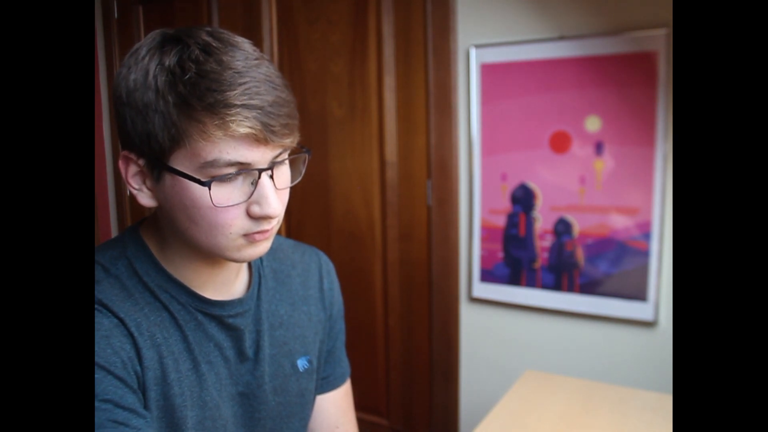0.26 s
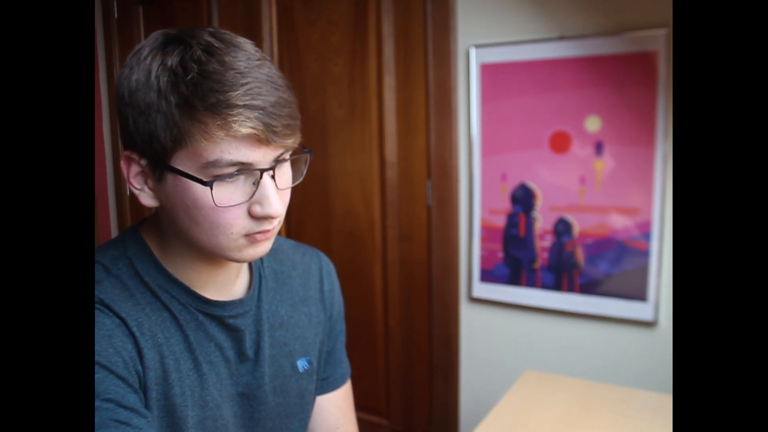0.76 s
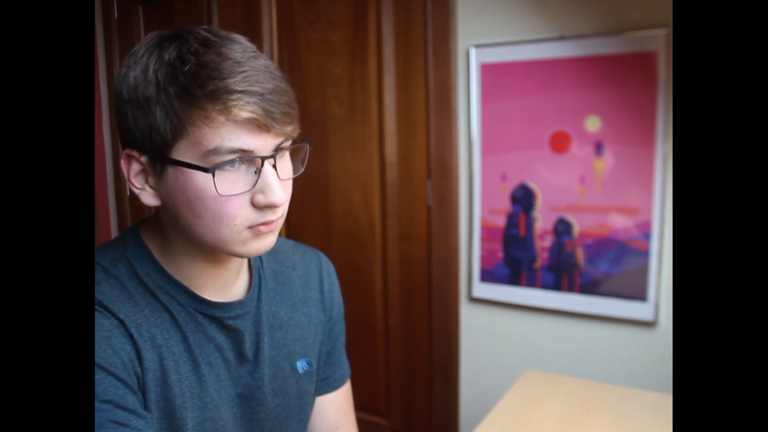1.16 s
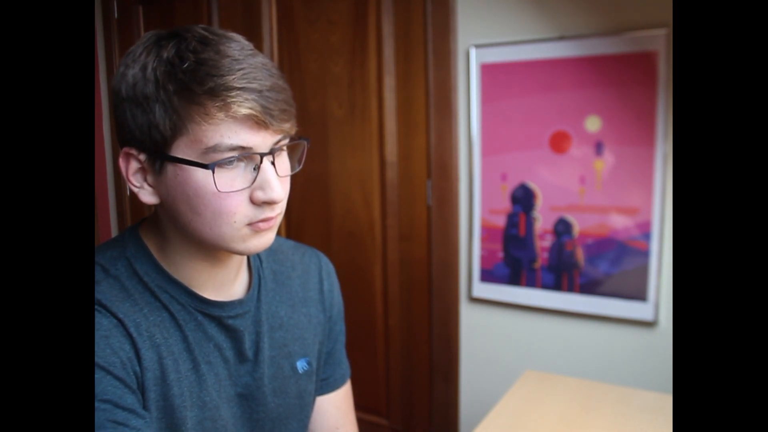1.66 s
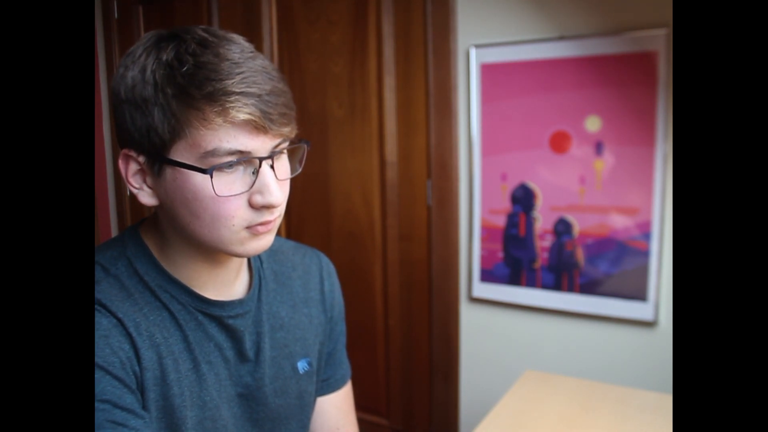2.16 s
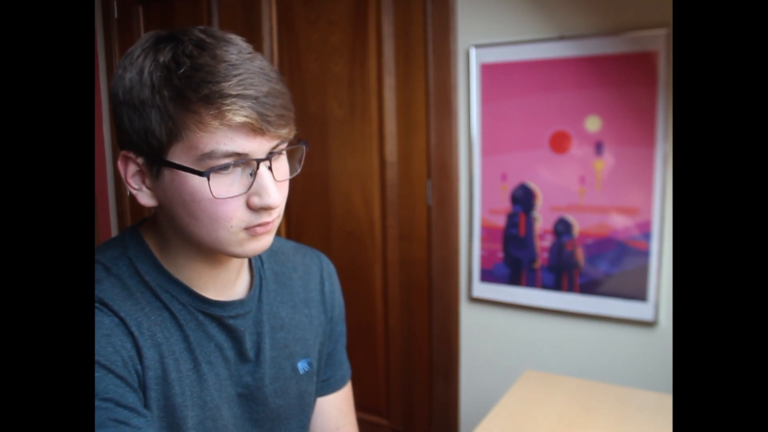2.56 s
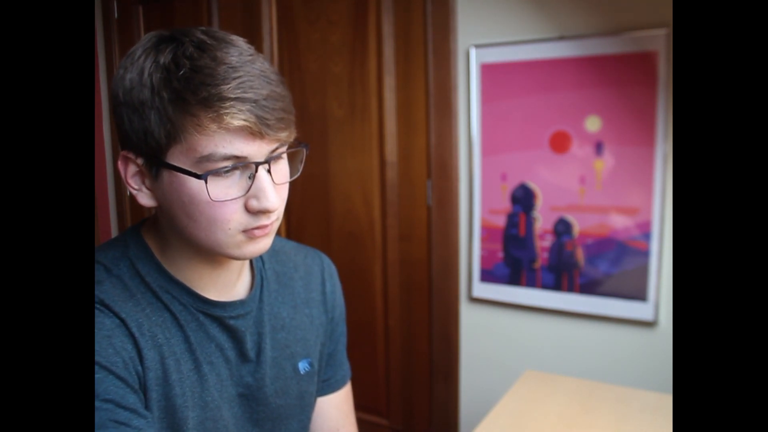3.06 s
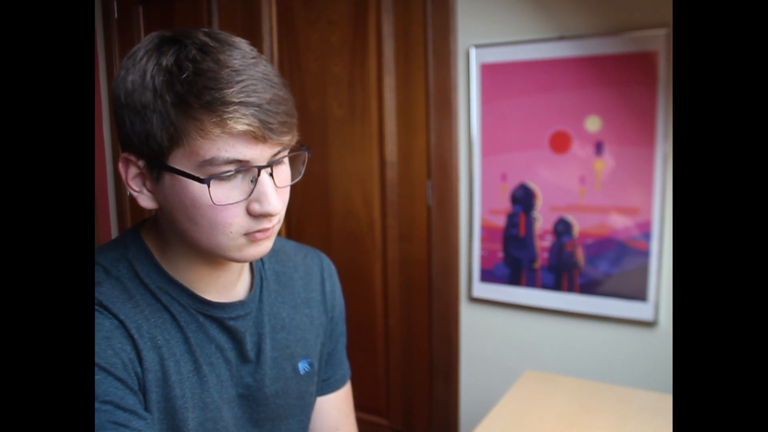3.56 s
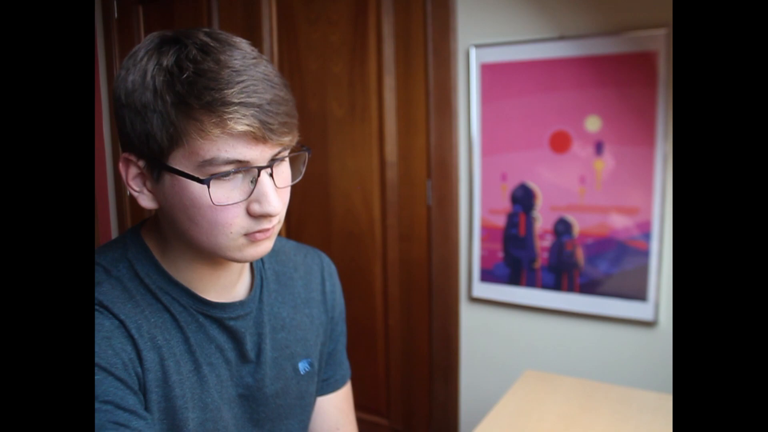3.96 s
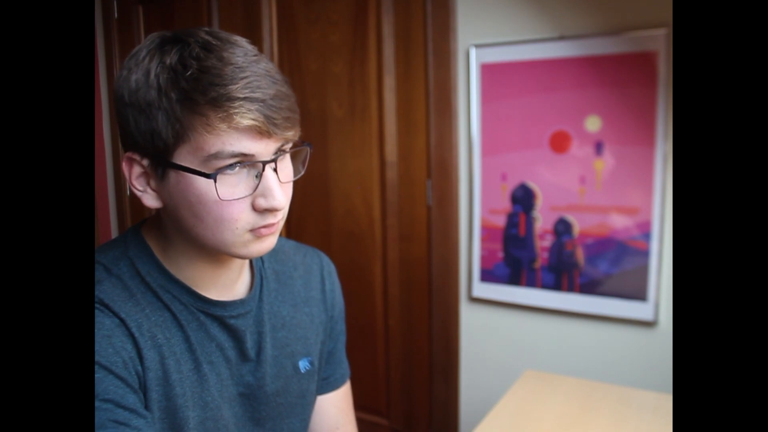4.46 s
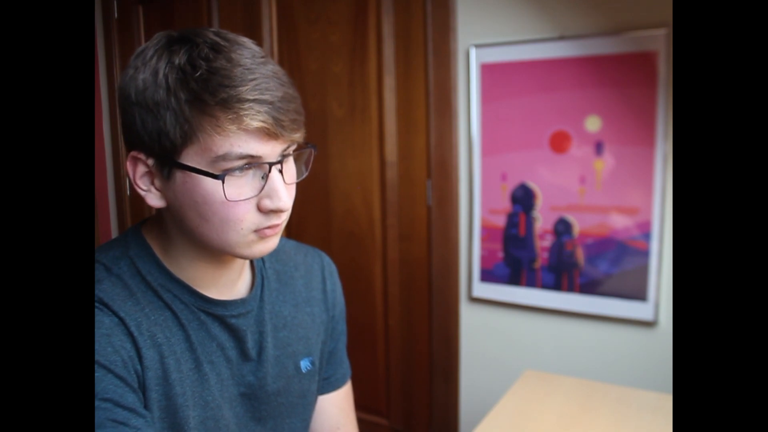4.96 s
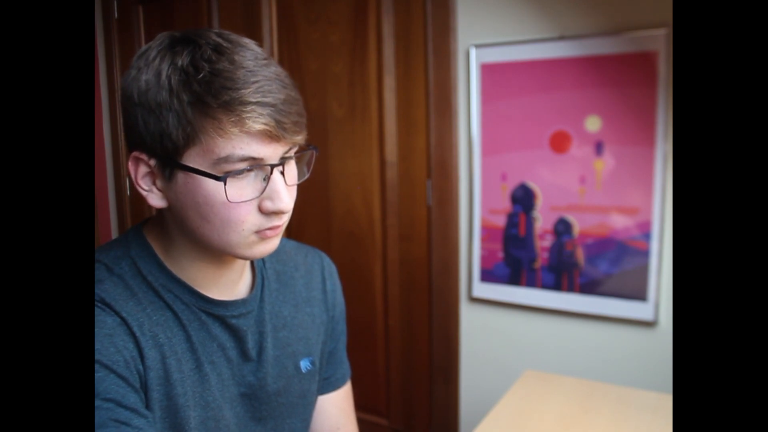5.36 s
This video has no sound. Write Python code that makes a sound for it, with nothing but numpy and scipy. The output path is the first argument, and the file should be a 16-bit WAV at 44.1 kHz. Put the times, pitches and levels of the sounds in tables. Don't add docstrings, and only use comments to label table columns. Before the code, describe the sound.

Six crisp computer mouse clicks, unevenly spaced, with soft low desk thuds over faint hiss and rumble in a small quiet room.

```python
import sys
import numpy as np
from scipy import signal
from scipy.fft import rfft, irfft
from scipy.io import wavfile
from scipy.ndimage import uniform_filter1d

SR = 44100
rng = np.random.default_rng(int(sys.argv[2]) if len(sys.argv) > 2 else 0)


def natural_amplitude(level_db):
    exponent = np.asarray(level_db, float) / 20
    return 10 ** exponent


def store_wav(level_fs):
    pcm = np.round(np.clip(np.atleast_2d(level_fs), -1, 1) * 32767)
    wavfile.write(sys.argv[1], SR, pcm.T.astype(np.int16))


N = 247489

# [f/Hz, level/dB per Hz]
HISS_COLOUR = [(8.8, -23.5), (17, 0), (30, -3.5), (49, -11.5), (150, -15), (1020, -33), (3500, -35),
               (15600, -40.5)]
# [f/Hz, level/dB]
WHINE_TONES = [(1000, -79.5), (2000, -81), (3000, -82), (3666, -85.5), (4000, -82.5), (5000, -84),
               (6000, -86.5), (9000, -87.5), (10000, -88.5), (11000, -85.5), (12000, -88.5), (13000, -85.5),
               (14000, -88.5), (15000, -84.5)]
# [t/s, level/dB]
PALM_RUB = [(0.0, -64), (0.1, -73), (0.25, -67), (0.41, -59.5), (0.6, -70), (0.72, -62.5), (1.3, -69),
            (1.47, -59), (1.6, -67.5), (2.2, -72), (2.38, -58.5), (2.6, -65.5), (3.4, -71.5), (3.64, -65.5),
            (4.1, -71), (4.4, -59.5), (4.6, -67.5), (5.2, -64)]
# [f/Hz, width/Hz, level/dB]
RUB_RINGS = [(260, 110, 4.5), (449, 170, 9), (666, 280, -5.5), (876, 470, -6)]
# [t/s, board level/dB, second mode/dB, third mode/dB, stand sway/dB]
DOWN_BUMPS = [(0.811, -34, -40.5, -51.5, -35.5), (1.319, -33, -35.5, -45.5, -35),
              (1.98, -67, -44.5, -51.5, -60), (2.38, -30, -32.5, -48, -41),
              (2.908, -32.5, -38.5, -44.5, -31), (3.635, -35.5, -67, -55, -62),
              (4.267, -39, -52, -47, -57.5), (4.33, -38.5, -23.5, -22, -37.5),
              (4.833, -59, -40, -42.5, -43), (4.929, -46, -47, -46.5, -60), (5.013, -32, -37, -50, -40)]
# [t/s, board/dB, second/dB, third/dB, sway/dB]
UP_BUMPS = [(0.007, -45, -54, -64, -65), (0.196, -41, -46, -64, -44), (0.384, -61, -51.5, -51, -53),
            (0.414, -52, -64, -52, -60), (0.844, -65, -46.5, -72, -42), (0.856, -48, -65, -73, -46),
            (1.435, -33, -44, -57, -67), (1.538, -55, -45.5, -58, -59), (2.309, -44, -54, -53, -52),
            (2.349, -43, -51, -62, -59), (2.99, -56.5, -56, -55, -52), (3.15, -37, -39.5, -54, -40),
            (3.654, -37, -54.5, -52.5, -57), (3.709, -50, -53, -66, -47), (4.279, -48.5, -45.5, -46, -56.5),
            (4.871, -51, -48, -49.5, -55), (4.901, -57, -49, -55, -58), (5.064, -42, -42.5, -50, -56),
            (5.139, -51.5, -48, -52, -63)]
# [f/Hz, time to fall 60 dB/s, rise/s]
DESK_MODES = [(66.3, 0.33, .002), (128.7, 0.17, 0.0048), (183.4, 0.14, 0.01), (305, 0.072, 0.0052),
              (31.4, 0.067, .004)]
# [delay/s, polarity]
DESK_TRAVEL = [(0, 1), (.003, 1), (.006, 1), (.004, 1), (.005, -1)]
# [t/s, leaf rattle level/dB, shell level/dB]
FINGER_TOUCHES = [
    (0.309, -66, -54),
    (1.426, -58, -49.5),
    (1.467, -61, -58),
    (2.2943, -59, -50.5),
    (3.632, -58, -48),
    (4.2581, -58, -54.5),
    (4.334, -61.5, -56.5),
    (5.0592, -57, -47),
]
# [t/s, switch ring/dB, upper ring/dB, top fizz/dB, shell/dB]
SWITCH_SNAPS = [(0.3485, -45.5, -49, -45, -60), (0.374, -41.5, -42, -36.5, -57),
                (1.4287, -43.5, -39.5, -41.5, -50.5), (1.508, -44, -42, -41, -47.5),
                (2.3124, -48, -48, -42, -61), (2.3464, -44, -40.5, -45, -48.5),
                (3.6357, -37.5, -41, -34, -38.5), (3.699, -46.5, -44.5, -40, -51),
                (4.2651, -42.5, -43, -42.5, -49), (4.3114, -50.5, -39, -44.5, -49.5),
                (5.063, -49, -40, -50, -45.5), (5.1403, -47, -42, -41.5, -50)]
# [f/Hz, width/Hz, level/dB]
RING_GROUPS = [
    [(7200, 920, 3.5), (6740, 920, -10), (7870, 1400, -6)],
    [(11230, 1100, 2.5), (10200, 3800, -6)],
    [(13150, 3000, 2.5), (15700, 3100, -0.5)],
    [(5750, 1800, 6), (4210, 1500, -0.5)],
    [(2946, 1240, -3), (1914, 1300, -5), (1130, 830, -8)],
]
DRIVE_TIMES = [.0014, 0.0012, 0.0014, 0.002, 0.002]
RISE_TIMES = [0.0007, .0002, 0.00016, 0.001, 0.0016]
# [delay/s, level/dB]
REFLECTIONS = [(.0025, -3), (.0066, -2.5), (.0095, -11), (0.023, -7.5)]
# [f/Hz, time to fall 60 dB/s]
ROOM_DECAY = [(700, 0.23), (2600, 0.3), (7000, 0.22), (11000, 0.23), (15000, .15)]
# [f/Hz, level/dB]
ROOM_COLOUR = [(700, -1.5), (6300, 0), (7200, 3), (8200, -0.5), (9500, 0.5), (11300, -8), (13000, -7),
               (16000, -9)]
# [t/s, f/Hz, time to fall 60 dB/s, level/dB]
FOOT_TICK = (1.463, 880, 0.1, -49)
# [t/s, f/Hz, level/dB]
FINGER_SQUEAK = [
    (4.2, 5960, -95.5),
    (4.215, 6050, -70),
    (4.236, 5970, -73),
    (4.25, 6080, -77.5),
    (4.265, 6100, -82.5),
]


def evened(x):
    return x / np.sqrt(np.mean(x ** 2) + 1e-20)


def read(points, hz):
    f, value = np.transpose(points)
    return np.interp(np.log(hz + 1), np.log(f + 1), value)


def add(mix, s, sound):
    part = mix[round(s * SR):][:len(sound)]
    part += sound[:len(part)]


def resonate(x, hz, width):
    pole = np.exp((2j * np.pi * hz - np.pi * width) / SR)
    return 2 * signal.lfilter([1 - abs(pole)], [1, -pole], x).real


def ring_parts(drive, parts, pitch=1):
    total = 0
    for hz, width, db in parts:
        once = resonate(drive, hz * pitch, width)
        total = total + natural_amplitude(db) * resonate(once, hz * pitch, 2 * width)
    return total


def even_colour(x):
    z = rfft(x)
    return irfft(z / np.sqrt(uniform_filter1d(abs(z) ** 2, size=5) + 1e-12), len(x))


def hiss(level_db=-51.5, patchy_db=1.3, rumble_db=-1.0, rumble_hz=150):
    frames, hz = N // 512 + 5, np.fft.rfftfreq(2048, 1 / SR)
    real, imaginary, patches = rng.standard_normal((frames, 1025, 3)).T
    patches = evened(uniform_filter1d(uniform_filter1d(patches, 20, 0), 6, 1))
    lumps = evened(uniform_filter1d(rng.standard_normal(frames), 8))
    low = 1 / (1 + (hz / rumble_hz) ** 2)
    colour_db = read(HISS_COLOUR, np.minimum(hz, 15000))[:, None]
    frame_db = colour_db + patchy_db * patches + rumble_db * low[:, None] * lumps
    z = (real + 1j * imaginary) * natural_amplitude(frame_db)
    noise = signal.istft(z, nperseg=2048, noverlap=1536)[1][:N]
    return natural_amplitude(level_db) * evened(noise)


def whine(waver=0.69, waver_hz=0.632):
    t, out = np.arange(N) / SR, np.zeros(N)
    phases = rng.uniform(0, 2 * np.pi, (len(WHINE_TONES), 2))
    for (hz, db), (tone_phase, waver_phase) in zip(WHINE_TONES, phases):
        swell = 1 + waver * np.sin(2 * np.pi * waver_hz * t + waver_phase)
        out += np.sqrt(2) * natural_amplitude(db) * np.sin(2 * np.pi * hz * t + tone_phase) * swell
    return out


def rub(slips_per_s=2500, spread_db=1.5):
    s, db = np.transpose(PALM_RUB)
    sizes = rng.standard_normal(N) * natural_amplitude(spread_db * rng.exponential(1, N))
    slips = sizes * (rng.random(N) < slips_per_s / SR)
    return natural_amplitude(np.interp(np.arange(N) / SR, s, db)) * evened(ring_parts(slips, RUB_RINGS))


def bumps(gain_db=3.0, fourth_db=-14.5):
    t, out, modes = np.arange(SR // 2) / SR, np.zeros(N), []
    for (hz, t60, rise), (lag, polarity) in zip(DESK_MODES, DESK_TRAVEL):
        u = np.maximum(t - lag, 0)
        swell = 1 - np.exp(-(u / rise) ** 2)
        mode = swell * natural_amplitude(-60 * u / t60) * np.sin(2 * np.pi * hz * u)
        modes.append(polarity * mode / abs(mode).max())
    for sign, rows in ((-0.65, DOWN_BUMPS), (0.82, UP_BUMPS)):
        for s, board_db, second_db, third_db, sway_db in rows:
            levels_db = (board_db, second_db, third_db, third_db + fourth_db, sway_db)
            bump = sum(natural_amplitude(db + gain_db) * mode for db, mode in zip(levels_db, modes))
            add(out, s, sign * bump)
    return out


def strikes(press_db=-3.5, release_db=-7.5, touch_db=-1.3, touch_switch_db=-1.5, touch_fizz_db=3.5):
    rows = []
    for k, snap in enumerate(SWITCH_SNAPS):
        body_db = release_db if k % 2 else press_db
        rows.append((*snap, snap[-1] + body_db))
    for s, leaf, shell in FINGER_TOUCHES:
        rows.append((s, leaf + touch_switch_db, leaf, leaf + touch_fizz_db, shell, shell + touch_db))
    return rows


def snaps(gain_db=5.0, press_pitch=1, release_pitch=1.052):
    t, out = np.arange(900) / SR, np.zeros(N)
    for k, (s, *levels_db) in enumerate(strikes()):
        chatter = rng.standard_normal(len(t))
        pitch = release_pitch if k % 2 else press_pitch
        for db, group, last, rise in zip(levels_db, RING_GROUPS, DRIVE_TIMES, RISE_TIMES):
            burst = chatter * (1 - np.exp(-t / rise)) * np.exp(-t / last)
            drive = even_colour(burst) * np.exp(-t / (3 * last))
            ring = ring_parts(drive, group, pitch)
            add(out, s, natural_amplitude(db + gain_db) * ring / abs(ring).max())
    return out


def room(x, tail_db=-1.5, start_s=0.012, scatter_s=0.0016, dull_hz=11000):
    out, t_all = x.copy(), np.arange(N) / SR
    scatter = rng.standard_normal((len(REFLECTIONS), 200)) * np.exp(-np.arange(200) / SR / scatter_s)
    scatter[:, 0] = 5
    dulled = signal.lfilter(*signal.butter(1, dull_hz, fs=SR), x)
    for (s, db), rough in zip(REFLECTIONS, scatter):
        add(out, s, natural_amplitude(db) * signal.oaconvolve(dulled, rough / np.linalg.norm(rough))[:N])
    taps = rng.choice([-1., 1.], (3, SR // 2)) * (rng.random((3, SR // 2)) < 1 / 8)
    taps[:, :round(start_s * SR)] = 0
    hz, t, z = signal.stft(taps, SR, nperseg=128)
    fade_db = read(ROOM_COLOUR, hz)[:, None] - 60 * t / read(ROOM_DECAY, hz)[:, None]
    tails = signal.istft(z * natural_amplitude(fade_db), SR, nperseg=128)[1]
    for k, tail in enumerate(tails):
        share = np.sqrt(2 / 3) * np.cos(2 * np.pi * (3 * t_all + k / 3))
        out += natural_amplitude(tail_db) * signal.fftconvolve(x * share, tail / np.linalg.norm(tail))[:N]
    return out


def knock(rise_s=0.00087):
    s, hz, t60, db = FOOT_TICK
    t, out = np.arange(6000) / SR, np.zeros(N)
    fade = natural_amplitude(db - 60 * t / t60) * (1 - np.exp(-t / rise_s))
    add(out, s, fade * np.sin(2 * np.pi * hz * t))
    return out


def squeak():
    s, hz, db = np.transpose(FINGER_SQUEAK)
    t = np.arange(N) / SR
    tone = np.sin(2 * np.pi * np.cumsum(np.interp(t, s, hz)) / SR)
    return natural_amplitude(np.interp(t, s, db, -200, -200)) * tone


def scene():
    electronics = hiss() + whine()
    desk = rub() + bumps() + knock()
    mouse = room(snaps() + squeak())
    return (electronics + desk + mouse)[None]


def band_limit(x):
    return signal.sosfilt(signal.butter(12, 16940, fs=SR, output="sos"), x)


def record(dry, edge_hz=15950, leak_db=-32.5, cut_s=5.4125, fade_s=0.0019):
    lowpass = signal.firwin(511, edge_hz, window=("kaiser", 5), fs=SR)
    limited = signal.oaconvolve(dry, lowpass[None], "same")
    limited += natural_amplitude(leak_db) * dry
    gate = np.clip((cut_s - np.arange(N) / SR) / fade_s, 0, 1)
    return band_limit(limited * gate)


dry = scene()
out = record(dry)
store_wav(out)
```